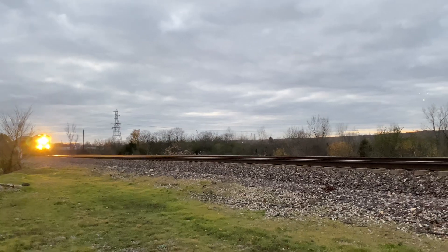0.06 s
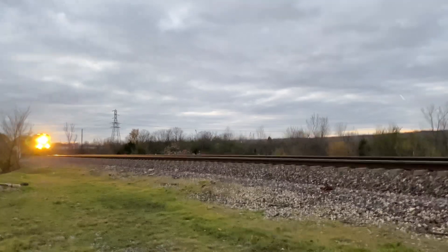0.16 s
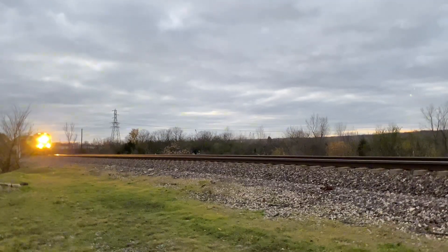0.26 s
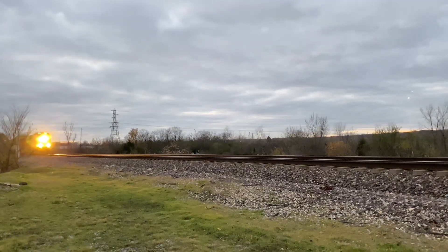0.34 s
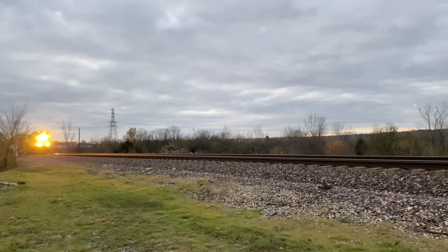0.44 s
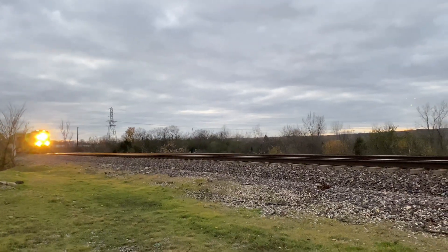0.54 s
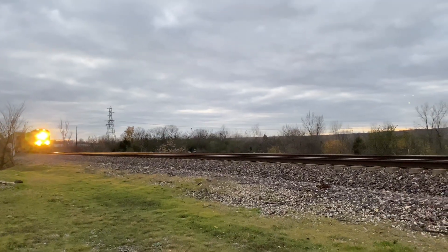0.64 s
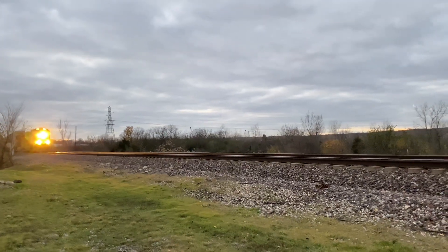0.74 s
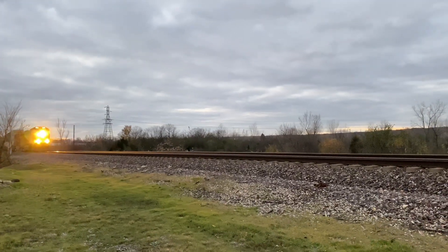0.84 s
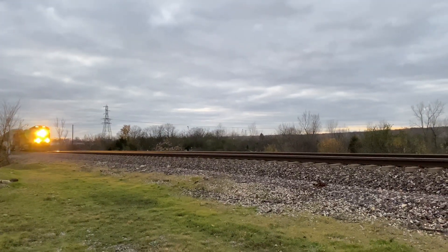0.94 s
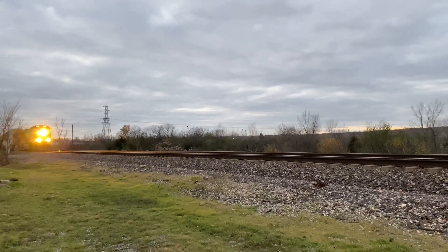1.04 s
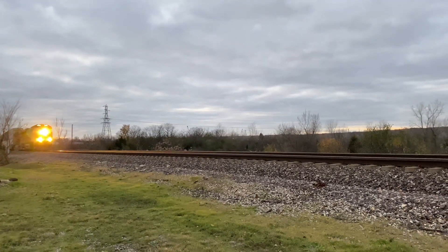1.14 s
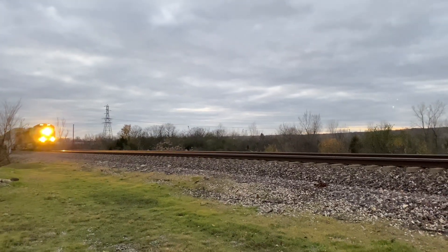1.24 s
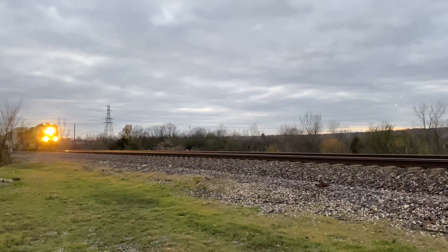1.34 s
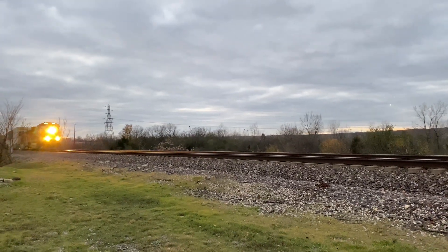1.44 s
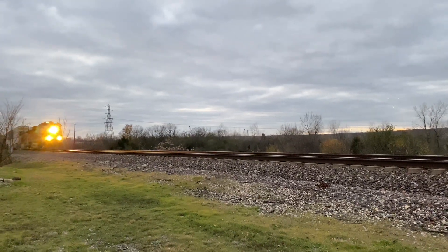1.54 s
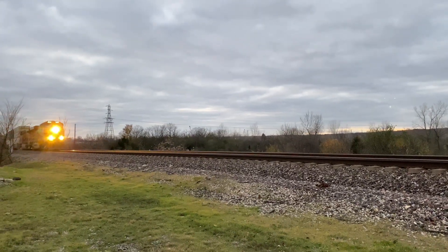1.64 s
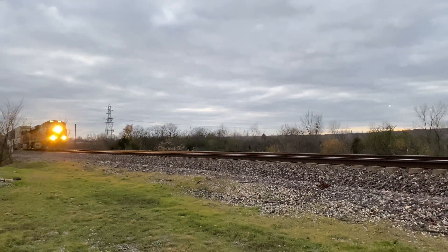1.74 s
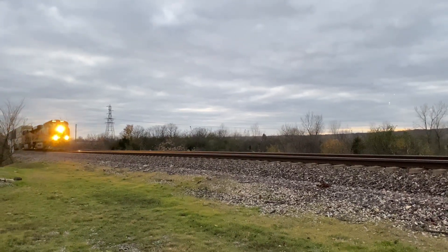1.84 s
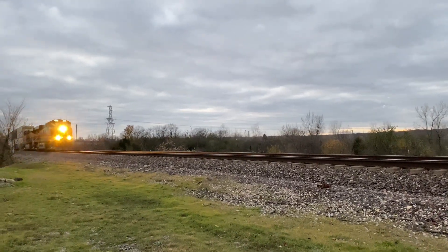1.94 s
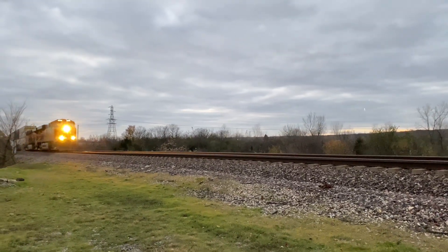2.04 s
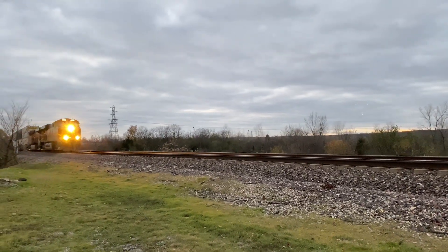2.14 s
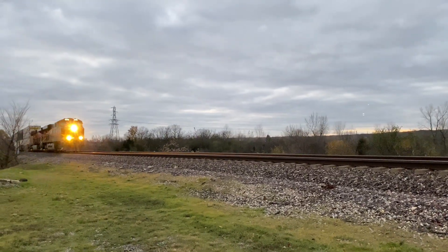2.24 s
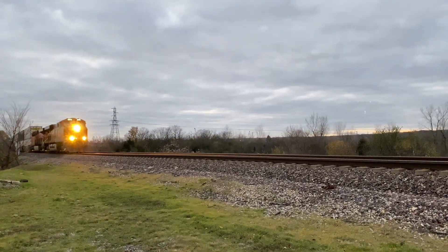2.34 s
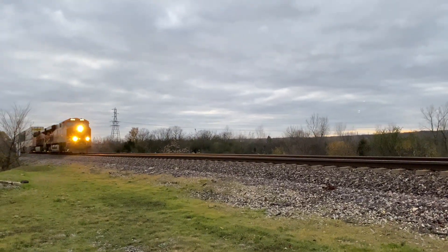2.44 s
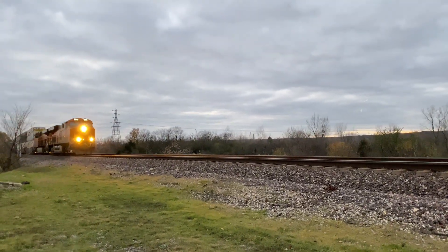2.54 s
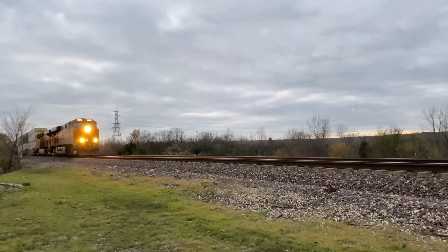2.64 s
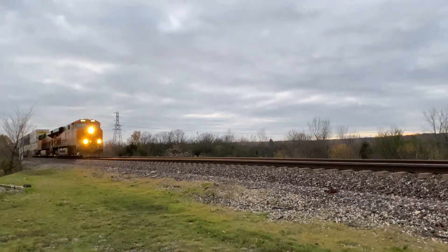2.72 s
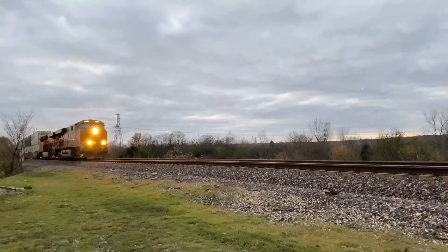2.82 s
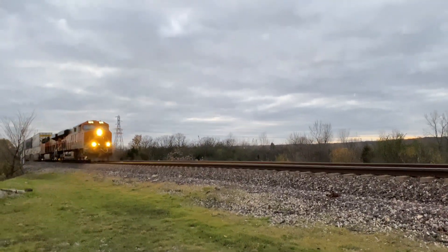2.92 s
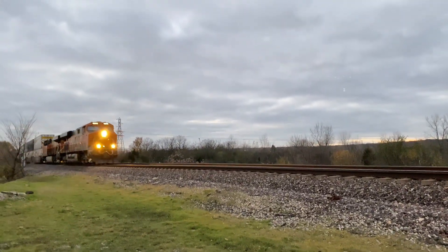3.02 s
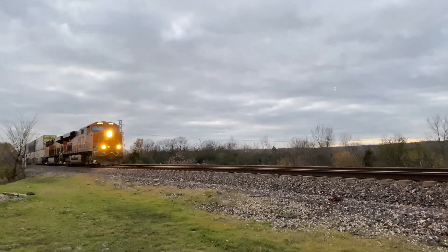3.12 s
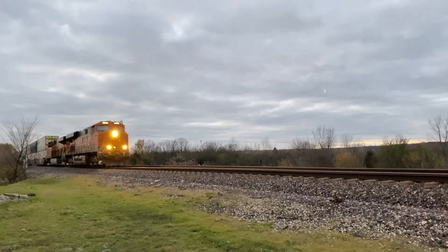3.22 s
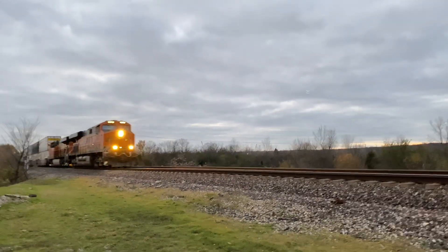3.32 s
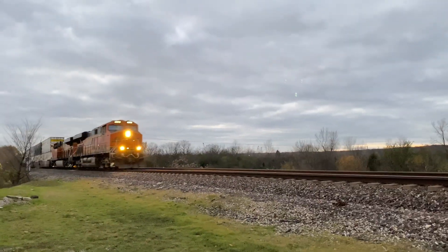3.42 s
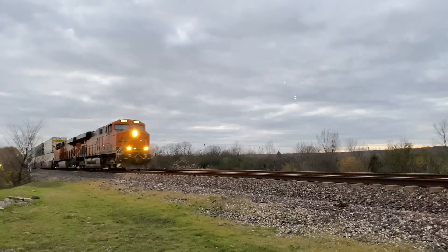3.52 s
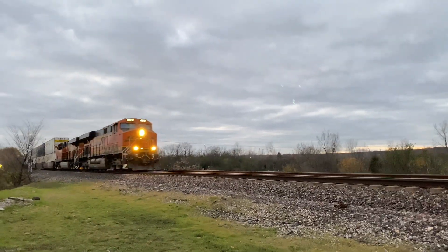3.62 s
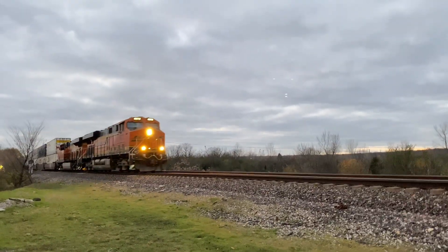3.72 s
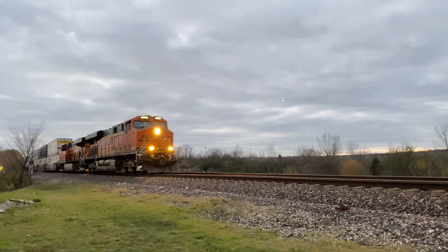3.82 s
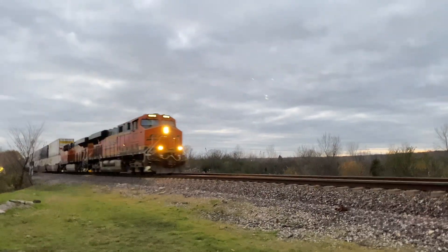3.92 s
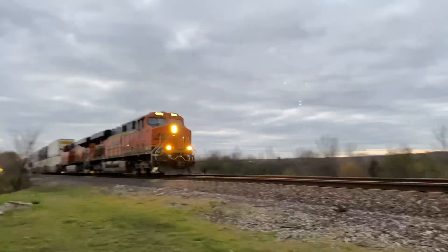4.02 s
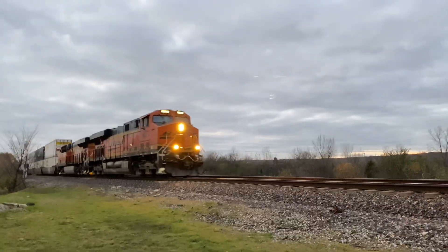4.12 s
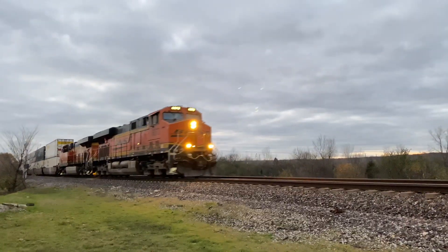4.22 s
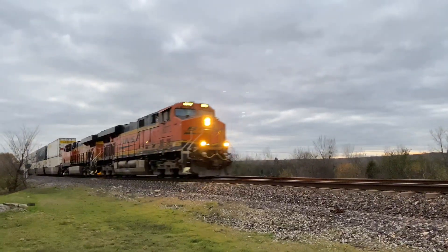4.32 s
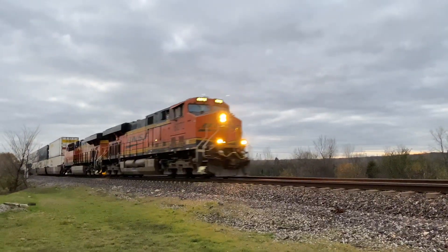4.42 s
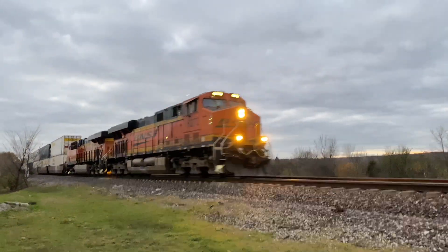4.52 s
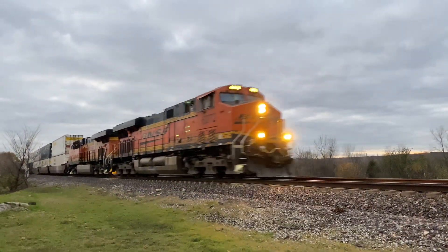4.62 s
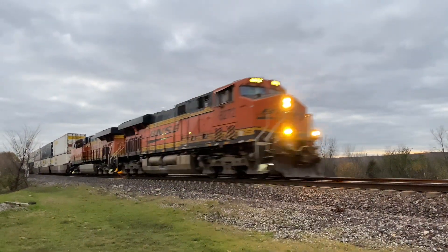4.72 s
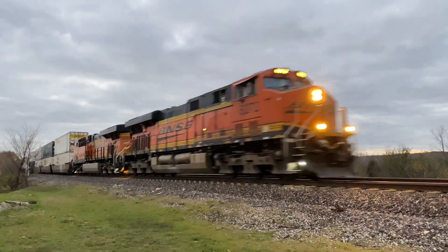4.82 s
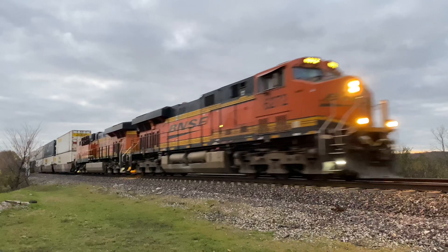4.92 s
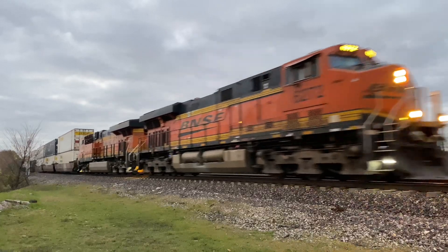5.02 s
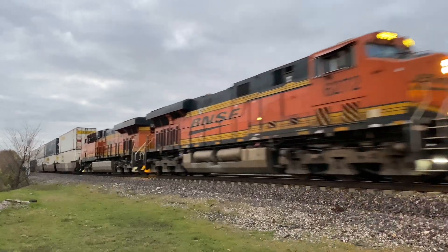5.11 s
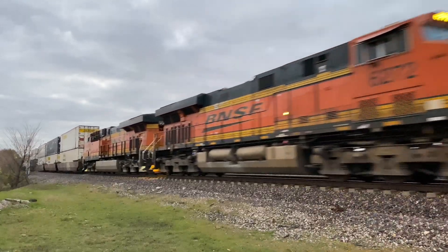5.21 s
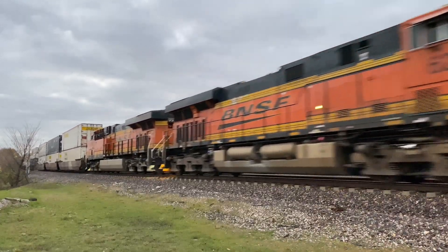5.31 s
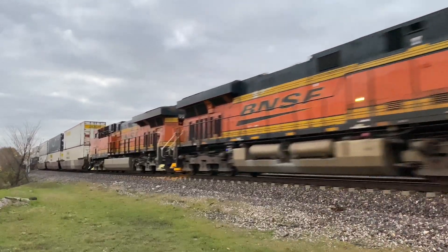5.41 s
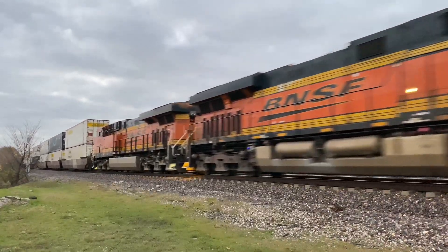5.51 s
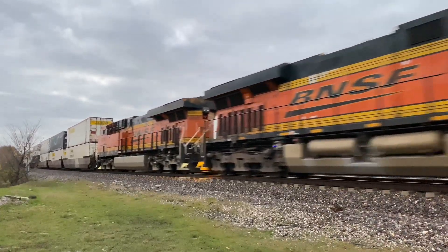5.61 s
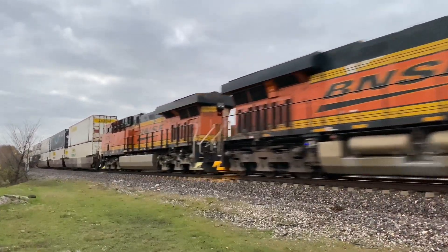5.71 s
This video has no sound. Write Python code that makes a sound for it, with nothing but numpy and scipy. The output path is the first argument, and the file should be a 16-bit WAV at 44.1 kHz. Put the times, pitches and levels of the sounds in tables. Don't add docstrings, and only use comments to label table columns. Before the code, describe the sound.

Thin singing rails and a low engine drone give way to a roaring, whining locomotive sweeping past, its chimed horn tooting briefly at the end.

```python
import sys
import numpy as np
from scipy import signal
from scipy.fft import rfft, irfft
from scipy.io import wavfile
from scipy.ndimage import uniform_filter1d

SR = 44100
rng = np.random.default_rng(int(sys.argv[2]) if len(sys.argv) > 2 else 0)


def pcm_store(signal):
    levels = np.round(np.clip(np.atleast_2d(signal), -1, 1) * 32767)
    wavfile.write(sys.argv[1], SR, levels.astype(np.int16).T)


def ratio_of_db(decibels):
    return 10 ** (np.asarray(decibels, float) / 20)


N = 254016
T = np.arange(N) / SR
SLOW = np.arange(0, N, 64) / SR

# (middle s, span s, size)
NEARING = (2.51, 2, 1.)
BEARING = (5.174, 0.79, -0.6)
BEARING_HZ = 3000


def evened(x):
    return x / np.sqrt(np.mean(abs(x) ** 2) + 1e-20)


def read(points, hz):
    f, value = np.transpose(points)
    return np.interp(np.log(hz + 1), np.log(f + 1), value)


def curves(rows, t):
    s, *columns = np.transpose(rows)
    return [np.interp(t, s, column) for column in columns]


def sweep(middle, span, size, t):
    u = (t - middle) / span
    return size * (1 + u / np.sqrt(1 + u ** 2)) / 2


def tent(peak, db, rise, fall, t):
    return db - np.maximum(rise * (peak - t), fall * (t - peak))


def burst(s, rise, fall):
    u = np.maximum(T - s, 0)
    peak = (1 + rise / fall) * (1 + fall / rise) ** (rise / fall)
    return (1 - np.exp(-u / rise)) * np.exp(-u / fall) * peak


def drift(hz, at):
    t = np.arange(0, N / SR + .01, 1 / 200)
    z = rng.standard_normal((len(t), 2)) @ [1, 1j]
    smooth = np.exp(-(np.fft.fftfreq(len(t), t[1]) / hz) ** 2)
    z = evened(np.fft.ifft(np.fft.fft(z) * smooth))
    return np.interp(at, t, z)


def tone(hz, db, lead_ms, fuzz=0., fuzz_hz=5., scatter=0.):
    lead = np.pi * hz * lead_ms / 1000
    size = ratio_of_db(db) * (1 + fuzz * drift(fuzz_hz, SLOW)) / np.sqrt(1 + fuzz ** 2)
    turns = np.cumsum(np.interp(T, SLOW, hz + 0 * SLOW)) / SR
    wave = np.exp(2j * np.pi * (turns + rng.random()))
    ports = []
    for side in (1, -1):
        path = np.exp(side * 1j * lead) + scatter * drift(fuzz_hz, SLOW)
        ports.append(np.interp(T, SLOW, size * path))
    return (wave * np.array(ports)).real * np.sqrt(2 / (1 + scatter ** 2))


def coloured(points):
    colour = ratio_of_db(read(points, np.fft.rfftfreq(N, 1 / SR)))
    return evened(irfft(rfft(rng.standard_normal((2, N))) * colour, N))


def engine():
    # far level/dB, near level/dB
    orders_db = [(-43.5, -53), (-26, -29.5), (-50, -45.5), (-56.5, -48), (-31.5, -21), (-27.5, -35),
                 (-39.5, -23), (-25.5, -10), (-23.5, -25), (-30.5, -35), (-22, -9), (-48.5, -28),
                 (-47, -43.5), (-40, -28.5), (-38.5, -33.5), (-34, -30.5), (-32, -41), (-33.5, -29.5),
                 (-50, -48.5), (-42.5, -45.5), (-47.5, -47.5), (-29.5, -33), (-30, -30.5), (-33, -26.5),
                 (-45.5, -41.5), (-38, -41)]
    beats = {9: (1.1, 0.63, 0.15, .3), 11: (2, 1., 2.3, 1), 12: (0.9, 0.63, 0.55, .1),
             13: (1, .4, 0.19, .2), 15: (1.002, 1.02, 0.42, 0.12), 16: (3.4, 1.55, 0.53, .1)}
    first_order, stack = 5, 15
    cycle_hz = 7.792 * (1 + sweep(5.2, .5, -.018, SLOW))
    near = sweep(*NEARING, SLOW)
    engine_gone, stack_gone = sweep(5.32, .08, -10, SLOW), sweep(4.95, 0.087, -14, SLOW)
    out = np.zeros((2, N))
    for k, (far_db, near_db) in enumerate(orders_db, first_order):
        rate, dip, far, close = beats.get(k, (0, 0, 0, 0))
        depth = far + near * (close - far)
        beat = abs(1 - depth * np.exp(2j * np.pi * rate * (SLOW - dip)))
        db = far_db + near * (near_db - far_db) + (stack_gone if k == stack else engine_gone)
        db = db + 20 * np.log10(beat + .01)
        out += tone(k * cycle_hz, db, 0, fuzz=.0005 * k ** 2, fuzz_hz=.15 * k, scatter=.08)
    return out


def gears():
    # t/s, low tone level/dB, upper pair level/dB
    load = [(0, -48.5, -41), (1, -45, -41), (2.2, -37, -33), (3.1, -36, -34), (3.65, -23, -26.5),
            (3.9, -23.5, -33), (4.25, -18, -35), (4.55, -20.5, -25.5), (4.72, -22.5, -29),
            (4.92, -16.5, -30.5), (5.1, -22.5, -34), (5.3, -22, -30.5), (5.5, -30.5, -38), (5.76, -32, -57)]
    # f/Hz, share of the pitch drop
    gear_hz = [(913.5, 1), (1328, .2), (1369, 1)]
    # far level/dB, near level/dB
    pair_trim = [
        (0.5, -3),
        (-6.5, 2.5),
    ]
    # frequency factor, level/dB
    side_tones = [
        (.957, -5.5),
        (1.045, -10.5),
        (.81, -13),
    ]
    waver_db, waver_hz = 3, 7.4
    drop, lead_ms = sweep(5.2, .5, -.036, SLOW), sweep(*BEARING, SLOW)
    low_db, pair_db = curves(load, SLOW)
    near = sweep(*NEARING, SLOW)
    levels = [low_db]
    for far_db, near_db in pair_trim:
        waver = waver_db * drift(waver_hz, SLOW).real
        levels.append(pair_db + far_db + near * (near_db - far_db) + waver)
    pitches = [hz * (1 + share * drop) for hz, share in gear_hz]
    fuzz = .25 + sweep(4.65, .12, .9, SLOW)
    out = np.zeros((2, N))
    for hz, db in zip(pitches, levels):
        out += tone(hz, db, lead_ms, fuzz=fuzz, fuzz_hz=20, scatter=.25)
    for factor, rel_db in side_tones:
        out += tone(pitches[0] * factor, low_db + rel_db, lead_ms, fuzz=4.9, fuzz_hz=36, scatter=1.0)
    return out


def roar():
    # f/Hz, level/dB per Hz
    far_spectrum = [(15, -44.5), (33, -27.5), (110, -2.5), (160, -18.5), (221, -20.5), (307, -22.5),
                    (603, -29), (901, -25), (1070, -35.5), (1350, -29.5), (1490, -35.5), (1860, -38),
                    (6060, -52.5), (7780, -72), (10000, -99.5), (13000, -119), (22000, -120)]
    # f/Hz, level/dB per Hz
    near_spectrum = [(120, -39.0), (200, -10.5), (513, -7.5), (902, -13.0), (1050, -22), (1360, -14.0),
                     (1540, -16.0), (2240, -17.5), (2880, -27.5), (6110, -31.5), (8500, -40.5),
                     (11000, -78), (18700, -120)][:-2] + [(10500, -43), (13000, -50), (15900, -54.0)]
    # f/Hz, width/Hz, level/dB
    wheels = [(887, 58, 11), (1447, 26, 1.5), (1814, 65, 8.5), (2192, 26, 10.5), (4000, 230, 6.5),
              (6270, 1200, 6)]
    # f/Hz, level/dB per Hz
    rail_hiss = [(6000, -61.5), (9800, -18), (11000, -13), (12000, -10), (13000, -4), (14000, -5.5),
                 (15000, -6.5), (15900, -10)]
    # f/Hz, likeness from 0 to 1
    likeness = [(60, 0.88), (200, 0.68), (450, 0.32), (1300, 0.5), (2500, 0.17), (5000, 0.14), (8000, 0.24),
                (10500, 0.17), (15000, 0.7)]
    # t/s, level/dB
    approach = [(0, -46), (.3, -44.5), (1.2, -48.5), (2, -45), (2.8, -38.5), (3.5, -30), (3.85, -26.5),
                (4.1, -22), (4.6, -20), (5, -19), (5.25, -19.5), (5.45, -34.5), (5.76, -28.5)]
    frames = N // 256 + 5
    hz = np.fft.rfftfreq(1024, 1 / SR)[:, None]
    t = np.arange(frames) * 256 / SR
    a, b, c, d, patches = rng.standard_normal((frames, 513, 5)).T
    patches = uniform_filter1d(patches, size=10, axis=0)
    patches = evened(uniform_filter1d(patches, size=16, axis=1))

    near_db = curves(approach, t)[0]
    far_db = -22 + 0.13 * (near_db + 18)
    rings_db = sum(db / (1 + (2 * (hz - f) / width) ** 2) for f, width, db in wheels)
    far = ratio_of_db(far_db) * evened(ratio_of_db(read(far_spectrum, hz) + 0.19 * rings_db))
    tilt_db = -0.42 * np.log2(hz / 1000 + 0.28)
    near = ratio_of_db(near_db + tilt_db) * evened(ratio_of_db(read(near_spectrum, hz) + rings_db))
    swell_db = np.maximum(tent(1.72, 7, 14, 25, t), 0)
    hiss_db = -71 + swell_db + 17.5 - 4 * np.clip(t - 2., 0, 2)
    hiss = ratio_of_db(hiss_db) * evened(ratio_of_db(read(rail_hiss, hz)))
    size = np.sqrt(far ** 2 + near ** 2 + hiss ** 2) * ratio_of_db(1.63 * patches)

    same = np.clip(read(likeness, hz), 0, 1)
    left, other = a + 1j * b, c + 1j * d
    late = np.exp(-2j * np.pi * hz * sweep(*BEARING, t) / 1000 * (hz < BEARING_HZ))
    right = late * (same * left + np.sqrt(1 - same ** 2) * other)
    unit = np.std(signal.istft(left, nperseg=1024, noverlap=768)[1])
    out = signal.istft(np.array([left, right]) * size, nperseg=1024, noverlap=768)[1]
    return out[:, :N] / unit


def rails():
    # peak t/s, level/dB, rise/dB per s, fall/dB per s
    singing = [(1.15, -47, 12, 38), (1.2, -63, 3, 25), (.6, -58, 4, 14), (2.35, -60, 40, 8),
               (2.5, -68, 3, 28)]
    singing_hz = [15272, 15337, 13937, 14147, 11682]
    out = np.zeros((2, N))
    for hz, row in zip(singing_hz, singing):
        out += tone(hz, tent(*row, SLOW), 0, fuzz=.5, fuzz_hz=8)
    return out


def ticks():
    # t/s, level/dB
    shots = [
        (3.0962, 0.),
        (3.3882, 0.5),
        (3.675, -1.5),
    ]
    # time after/s, level/dB, length/ms
    blades = [(0, -29, 6.8), (0.0125, -21, 3.1), (.0594, -27.5, 5), (.0921, -29.5, 4.9)]
    # t/s, level/dB, left over right/dB, length/ms
    handling = [(0.1033, -37, -8.5, 3), (0.1341, -26, 1, 3.2), (0.7743, -44, 3, 2)]
    # f/Hz, level/dB per Hz
    shutter = [(1470, -32), (2500, -9.5), (4160, -20), (4840, -1.5), (6880, -7.5), (7580, -18), (8740, -9),
               (11800, -25), (13100, -20), (15000, -33)]
    # level/dB, rise/ms, fall/ms
    spits = [
        (-16, 1.1, 6.5),
        (-33.5, 4.4, 15),
        (-42, 24, 25),
    ]
    spit_s = [5.1395, 5.145, 4.02]
    # f/Hz, level/dB per Hz
    spit = [(1760, -38), (3000, -9), (3750, -11), (4350, -2.5), (5630, 2.5), (9270, -15), (9870, 4),
            (11400, -10), (13000, -13), (14800, -15), (16000, -29)]
    rows = list(handling)
    for s, db in shots:
        rows += [(s + after, db + part_db, 0, ms) for after, part_db, ms in blades]
    shape = np.zeros((2, N))
    for s, db, pan_db, ms in rows:
        pan = np.array([[pan_db], [-pan_db]]) / 2
        shape += ratio_of_db(db + pan) * burst(s, .0004, ms / 1400)
    puffs = np.zeros(N)
    for s, (db, rise, fall) in zip(spit_s, spits):
        puffs += ratio_of_db(db) * burst(s, rise / 1000, fall / 1000)
    rattle, air = coloured(shutter), coloured(spit)
    return .6 * shape * (.9 * rattle[0] + .4 * rattle) + puffs * (.9 * air[0] + .45 * air)


def bird():
    # t/s, level/dB, f/Hz
    chirps = [(0.245, -26.5, 3070), (0.5477, -48, 2680), (0.587, -26, 3080), (0.9817, -27.5, 3070),
              (1.286, -32, 3060), (1.5454, -30, 3110), (1.6147, -29, 2550)]
    out = np.zeros((2, N))
    for s, db, hz in chirps:
        out += burst(s, .02, .045) * tone(hz, db - 18, 0, fuzz=5, fuzz_hz=150, scatter=.7)
    return out


def horn():
    # start t/s, first partial level/dB, second partial level/dB, overshoot/dB
    chimes = [(5.248, -19, -21.5, 7), (5.238, -27, -25, 19.5), (5.262, -17, -24.5, 1.5),
              (5.27, -43.5, -19.5, 2)]
    chime_hz = [267.3, 370, 484, 258]
    partials_db = [
        [3.5, -1.5, -9, -30, -8.5, -22, -18, -13.5, -17.5, -27, -23.5, -27, -31, -24, -32, -29, -30, -25],
        [0, -6.5, -14, -19, -23, -22, -23, -16.5, -29, -19, -22],
        [-1, -4, -5, -12, -19, -19, -21, -26, -24, -19],
        [-0.5, -12, -15, -31, -20, -28, -30, -32],
    ]
    bell = [-19, -19, -19, -19]
    attack_s, upper_attack_s, overshoot_s = .02, 0.056, .06
    sag, release, dulling = 11, 30, 75
    shut_s = 5.52
    air_db = np.minimum(tent(5.42, -26, 120, 130, T), -38)
    air = coloured([(2000, -23), (5000, -5), (8000, 0.5), (11500, -2), (16000, -15)])
    out = ratio_of_db(air_db) * air[[0, 0]]
    start = round(5.2 * SR)
    t = T[start:]
    shut = np.maximum(t - shut_s, 0)
    for base_hz, (s, first_db, second_db, over_db), partials, fall_db in zip(
            chime_hz, chimes, partials_db, bell):
        u = np.maximum(t - s, 0)
        level_db = -sag * u - release * shut
        first = ratio_of_db(first_db + level_db + over_db * np.exp(-u / overshoot_s))
        first = first * np.minimum(u / attack_s, 1)
        opening = np.minimum(u / upper_attack_s, 1)
        hz = base_hz * (1.029 + sweep(5.38, .17, -.04, t))
        turns = np.cumsum(hz * (1 + .003 * drift(40, t).real)) / SR
        lead = sweep(*BEARING, t) * hz / 2000
        sides = np.array([lead, -lead])
        for k in range(1, int(8000 / base_hz)):
            top = min(k, len(partials) + 1)
            db = second_db + level_db + partials[top - 2] + fall_db * np.log2(k / top)
            db = db - dulling * shut * np.log2(k / 2)
            size = first if k == 1 else ratio_of_db(db) * opening ** np.log2(2 * k)
            echo = 1 + min(.08 + .07 * k, 1) * drift(25, t)
            echo = echo + min(.1 + .08 * k, .6) * np.array([drift(12, t), drift(12, t)])
            wave = np.exp(2j * np.pi * k * (turns + sides * (k * base_hz < BEARING_HZ)))
            out[:, start:] += np.sqrt(2) * size * (echo * wave).real
    return out


def scene():
    return engine() + gears() + roar() + rails() + ticks() + bird() + horn()


def muted(x):
    # f/Hz, level/dB
    mute_db = [
        [(6000, -97), (8500, -93), (9300, -84), (9800, -90), (12300, -86), (12500, -72), (13700, -72),
         (13900, -84), (15500, -83)],
        [(6000, -97), (9000, -92), (10300, -88), (10600, -82), (12000, -82), (12400, -86), (14500, -85),
         (15000, -76)],
    ]
    edge_hz = [15850, 15330]
    edges = np.arange(6200, 16000, 172)
    hz, t, z = signal.stft([x[0] + x[1], x[0] - x[1]], SR, window="cosine", nperseg=2048)
    masking_db = 5 * sweep(*NEARING, t)
    for lo, hi in zip(edges, edges[1:]):
        band = (hz >= lo) & (hz < hi)
        floor_db = np.array([[read(points, lo)] for points in mute_db])
        limit = ratio_of_db(2 * (floor_db + masking_db))
        power = (abs(z[:, band]) ** 2).sum(1) / 4
        z[:, band] *= (power > limit)[:, None]
    z *= (hz < np.array(edge_hz)[:, None])[..., None]
    mid, side = signal.istft(z, SR, window="cosine", nperseg=2048)[1][:, :N] / 2
    return np.array([mid + side, mid - side])


def top_cut(x):
    return signal.sosfilt(signal.butter(12, 16470, fs=SR, output="sos"), x)


def record(dry):
    # f/Hz, level/dB
    left_db = [(60, -1), (150, -1.5), (380, -1), (950, -1.5), (2380, -2.5), (5980, -0.5), (15000, -0.3)]
    port_ms = .265
    hz = np.fft.rfftfreq(N, 1 / SR)
    tilt = ratio_of_db(read(left_db, hz) / 2) * np.exp(1j * np.pi * hz * port_ms / 1000)
    x = irfft(rfft(dry) * np.array([tilt, 1 / tilt]), N)
    x = x / (1 + abs(x / .97) ** 4) ** .25
    mix = muted(x)
    return top_cut(mix)


dry = scene()
out = record(dry)
pcm_store(out)
```